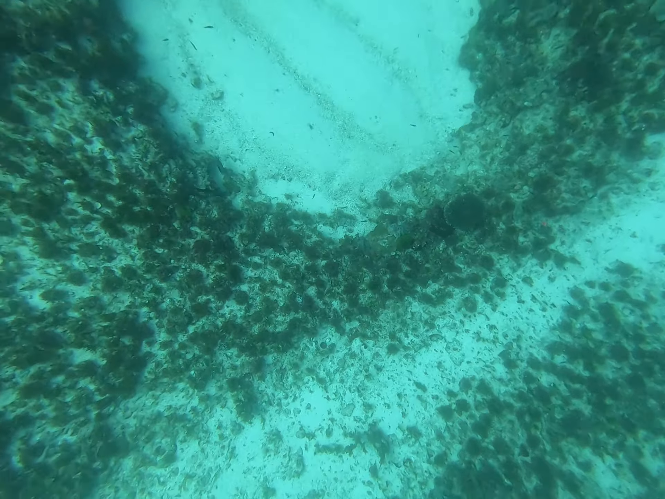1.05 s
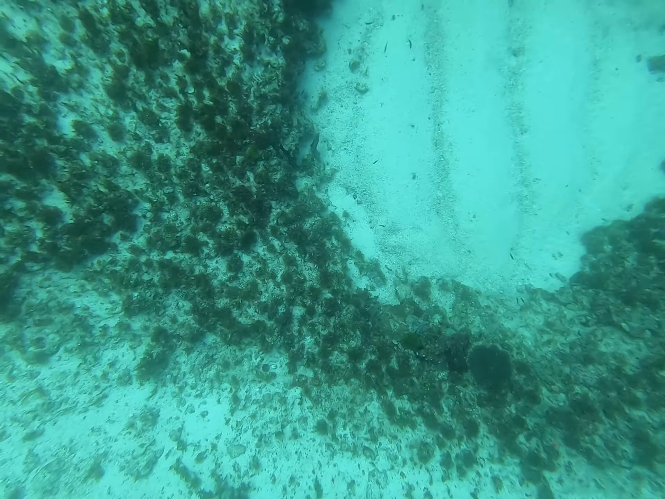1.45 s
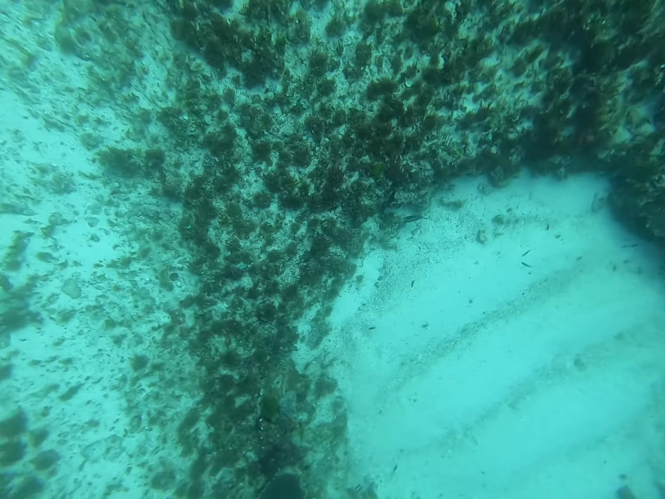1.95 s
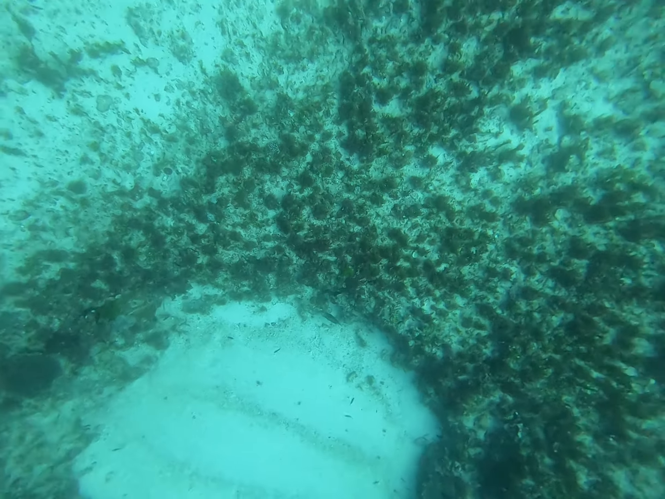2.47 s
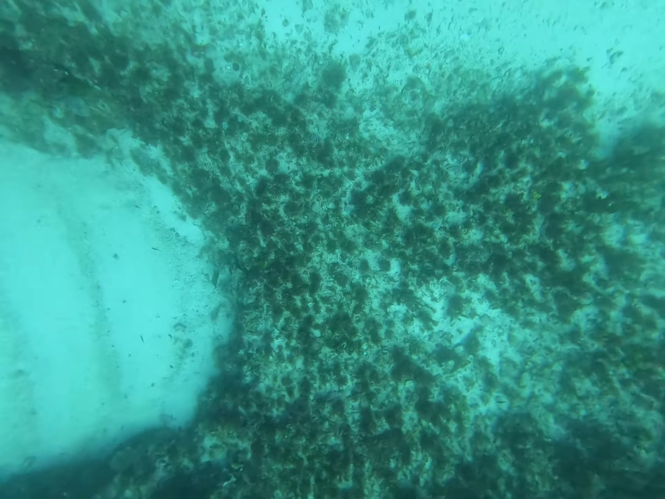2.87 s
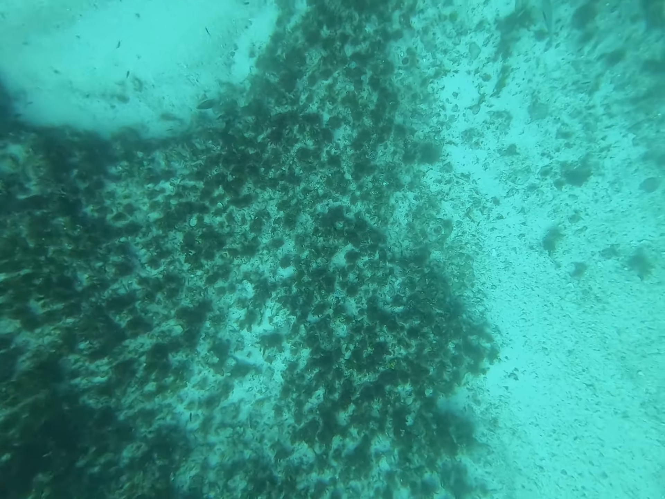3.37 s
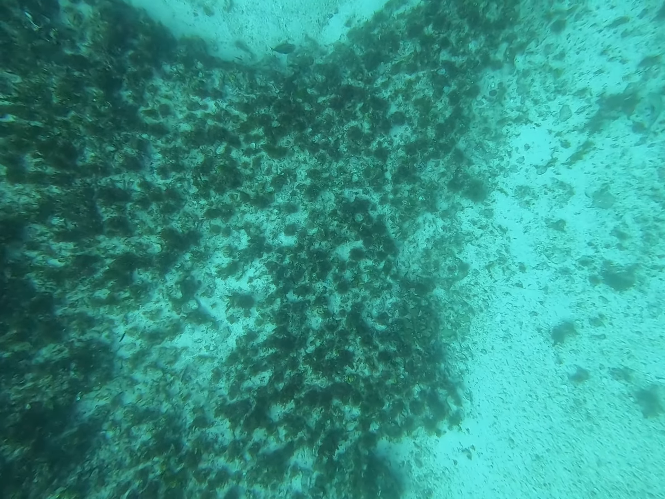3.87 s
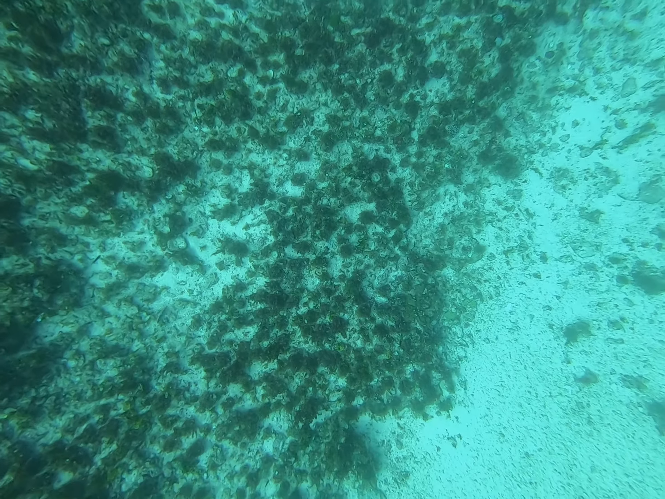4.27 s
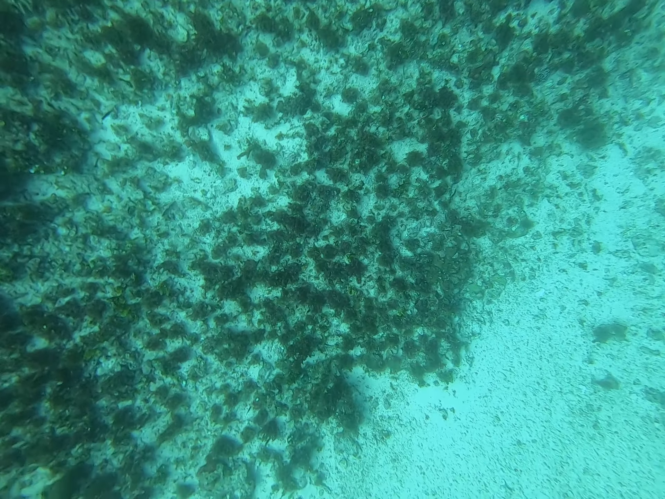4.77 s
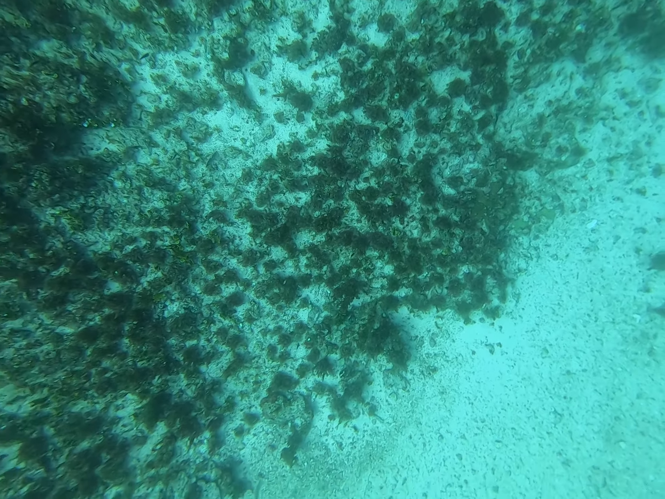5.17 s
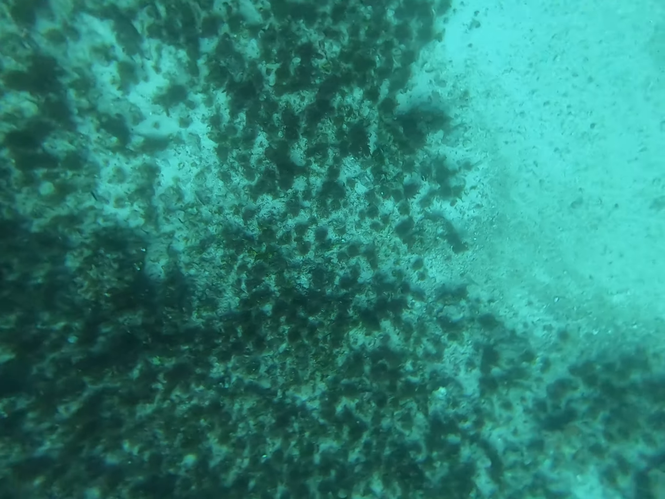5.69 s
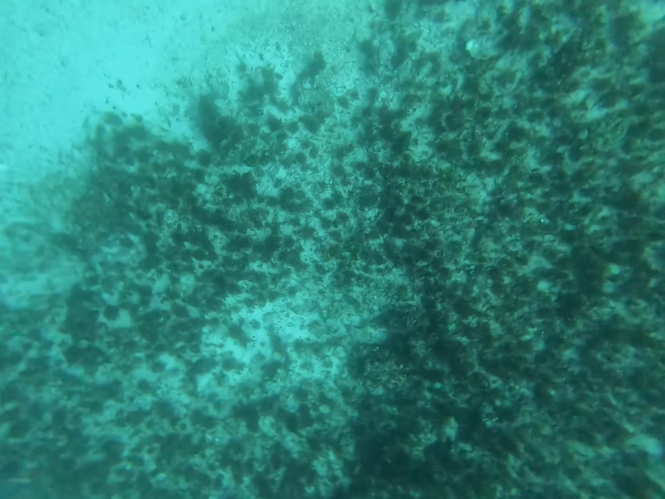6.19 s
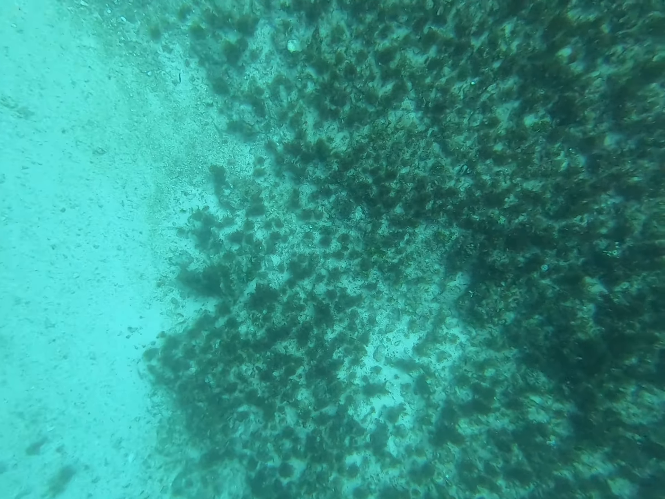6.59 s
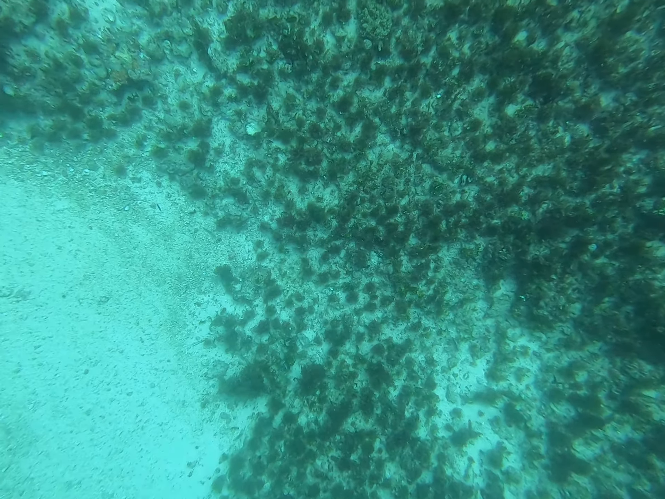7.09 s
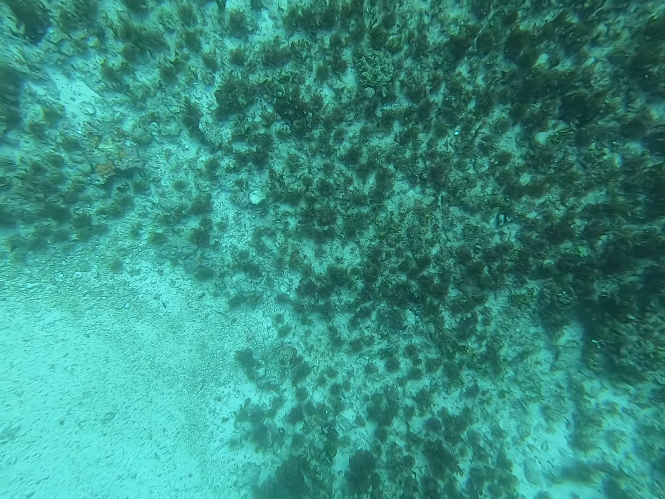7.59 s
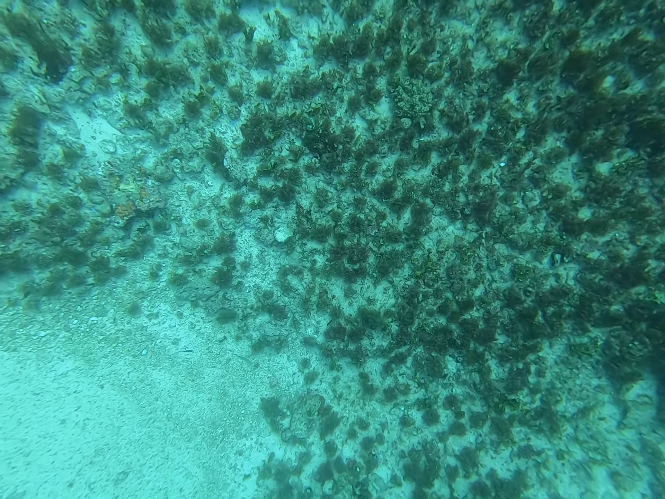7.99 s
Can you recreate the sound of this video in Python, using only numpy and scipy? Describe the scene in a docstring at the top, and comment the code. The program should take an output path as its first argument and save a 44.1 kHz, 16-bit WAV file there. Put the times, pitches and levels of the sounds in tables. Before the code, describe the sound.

Underwater close to a sandy, weedy sea floor, a boat engine hums with a hollow, wavering mid-low tone. Sparse shrimp snaps and fine crackle sit on top, with low water surges and soft knocks on the microphone housing. The hum dips slightly midway, then swells after six seconds, its wide stereo image narrowing to the centre as fluttering bright wash joins in.

```python
"""A boat engine drones through the water and rings the modes of a sealed housing near the sea floor.
From the start a wavering engine tone sounds, water surges thump and shrimp snap over a fine crackle.
The engine is noise sent through resonances; the snaps are noise puffs, the knocks short decaying swings.
From 5.5 s the colour changes, and from 6 s the wide image of two microphones narrows to the centre
as the rumble swells; from 7.4 s the colour drifts part of the way back."""
import sys
import numpy as np
from scipy import signal
from scipy.fft import rfft, irfft
from scipy.io import wavfile
from scipy.ndimage import uniform_filter1d

SR = 44100
rng = np.random.default_rng(int(sys.argv[2]) if len(sys.argv) > 2 else 0)


def wrap_up_sound(samples):
    """Save the sound to the file named by the first command line argument, as 16-bit audio."""
    columns = np.atleast_2d(samples).T
    # keep every value between -1 and 1, then stretch to whole-number steps
    tamed = np.clip(columns, -1, 1)
    steps = np.round(tamed * 32767).astype(np.int16)
    wavfile.write(sys.argv[1], SR, steps)


N = 363825
HZ = np.fft.rfftfreq(N, 1 / SR)


def from_db(db):
    """Turn decibels into a gain."""
    return 10 ** (np.asarray(db) / 20)


def rms_one(x):
    """Scale a signal to an rms (average strength) of 1."""
    return x / np.sqrt(np.mean(x ** 2) + 1e-30)


def in_time(rows):
    """Draw the columns of a curve table as straight lines between its times, at every sample."""
    s, *columns = np.transpose(rows)
    return [np.interp(np.arange(N) / SR, s, c) for c in columns]


def drift(rate):
    """Slow random wandering of spread 1, made by smoothing noise; a higher rate wanders faster."""
    step = 40  # samples between the computed points
    r = np.exp(-2 * step * np.pi * rate / SR)
    noise = rng.standard_normal(N // step + 2002)
    slow = signal.lfilter([1], [1, -2 * r, r * r], noise)[2000:]  # drop the start-up
    return np.interp(np.arange(N) / step, np.arange(len(slow)), rms_one(slow))


def ring(x, hz, width_hz):
    """One resonance: a click swings at its pitch and dies away, faster when the width is larger."""
    r, w = np.exp(-np.pi * width_hz / SR), 2 * np.pi * hz / SR
    return signal.lfilter([0, np.sin(w)], [1, -2 * r * np.cos(w), r * r], x + 1e-18)


def bursts(clicks, decay_s):
    """Each click becomes a puff of noise that dies within milliseconds, so that no two share a colour."""
    r = np.exp(-1 / (decay_s * SR))
    envelope = signal.lfilter([1 - r], [1, -2 * r, r * r], np.abs(clicks))
    return envelope * rng.standard_normal(N)


def magnitude(modes, column):
    """Gain over frequency of steep-sided modes whose powers add."""
    power = 0
    for mode in modes:
        offset = 2 * (HZ - mode[0]) / (1.277 * mode[1])
        power = power + from_db(2 * mode[column]) / (1 + offset ** 2) ** 2
    return np.sqrt(power)


def causal(gain):
    """Minimum-phase response of a gain curve, so that nothing rings ahead of its click."""
    cepstrum = irfft(np.log(gain), N)
    cepstrum[1:(N + 1) // 2] *= 2      # fold onto positive lags
    cepstrum[N // 2 + 1:] = 0
    return np.exp(rfft(cepstrum))


def notched(column):
    """Narrow dips where neighbouring modes cancel."""
    # dips: pitch_hz, width_hz, depth in the sum (0-1), depth once folded (0-1)
    notches = [(976, 54, 0.16, 0.05), (1052, 34, 0.05, 0.8), (1583, 37, 0.1, .45), (1686, 45, 0.4, .2),
               (8950, 830, 0.01, .97)]
    dips = [1 - np.clip(n[column], 0, 1) / (1 + 2j * (HZ - n[0]) / n[1]) for n in notches]
    return np.prod(dips, axis=0)


def crackle(share):
    """Distant shrimp: dense snaps of uneven size in loose bunches over smooth noise."""
    sizes = from_db(3.6 * np.minimum(rng.exponential(1, N), 4.0))
    chance = 400 * from_db(3.6 * drift(9.0)) / SR  # of a snap in each sample
    clicks = sizes * (rng.random(N) < chance)
    return rms_one(share * rms_one(bursts(clicks, 0.00027)) + rng.standard_normal(N))


def snaps(folded):
    """Near shrimp: a short puff into the upper housing modes, each with strengths of its own."""
    # shrimp snaps: start_s, level_db (before the modes), top_db (extra, of which each mode takes a share)
    snap_rows = [(0.0867, -46, -24), (0.1096, -44, -25), (0.3122, -42, -26), (0.5013, -41, -15),
                 (0.5836, -47, -17), (0.6195, -39, -29), (0.6888, -49, -22), (0.8669, -46, -23),
                 (1.1013, -37, -14), (1.1488, -47, -30), (1.2288, -34.5, -14), (1.3084, -43, -19),
                 (1.4194, -41, -22), (1.4581, -43, -18), (1.6317, -44, -32), (1.645, -39, -41),
                 (2.1171, -49, -28), (2.1916, -44.5, -11), (2.3136, -41, -23), (2.382, -48, -16),
                 (2.4085, -38.5, -24), (2.5366, -44, -22), (2.5611, -33, -30), (2.597, -34, -25),
                 (2.8654, -47, -24), (2.8958, -46, -24), (3.0614, -45, -19), (3.0764, -41, -25),
                 (3.0944, -46, -23), (3.386, -44.5, -16), (3.4111, -44, -12), (3.5164, -44, -18),
                 (3.5643, -43, -24), (3.5786, -38, -20), (3.6498, -45, -18), (3.7015, -47, -25),
                 (3.803, -39.5, -28), (4.0495, -38, -26), (4.0567, -36, -27), (4.0671, -30, -34),
                 (4.088, -38, -34), (4.15, -44, -22), (4.183, -37, -30), (4.195, -44, -20),
                 (4.252, -46, -20), (4.2758, -38, -25), (4.294, -34, -36), (4.595, -46, -20),
                 (4.8, -40, -25), (4.9043, -39, -27), (4.9682, -49, -14), (5.059, -36, -27),
                 (5.1677, -43, -25), (5.1999, -48, -21), (5.434, -41, -18), (5.4836, -41, -20),
                 (5.5786, -36, -37), (5.64, -42, -23), (5.6535, -39, -27), (5.7309, -40, -19),
                 (5.8004, -39, -30), (5.8521, -44, -31), (5.8731, -32, -31), (5.904, -36, -24),
                 (5.9466, -43, -29), (6.0243, -41, -25), (6.0447, -31, -29), (6.1664, -45, -22),
                 (6.188, -37.5, -25), (6.2337, -47, -22), (6.3818, -31.5, -17), (6.4453, -46, -23),
                 (6.4735, -35.5, -16), (6.515, -37, -25), (6.6523, -40, -18), (6.9192, -42, -29),
                 (7.0242, -41, -28), (7.0544, -47, -24), (7.0806, -43, -26), (7.3153, -40, -28),
                 (7.7112, -43, -23), (7.7503, -39, -21), (7.8166, -39, -25), (7.861, -26, -31),
                 (7.9295, -38, -9), (7.9513, -35, -23), (8.1501, -38, -24)]
    s, level_db, top_db = np.transpose(snap_rows)
    at, out = (s * SR).astype(int), np.zeros((2, N))
    luck_db = rng.normal(0, 1.0, (len(at), 5))
    # pitch_hz, width_hz, level_db, share of top_db, gain once folded_db
    modes = [(3410, 740, -4.5, 0.17, 4), (5670, 1300, -8.5, 0.0085, -6.0), (7300, 1200, -26.0, 0.23, 15),
             (8820, 1600, 0.0, 0.63, -4.5), (12000, 3000, -3.5, 0.79, -2)]
    for k, (hz, width_hz, mode_db, top_share, folded_db) in enumerate(modes):
        clicks = np.zeros(N)
        snap_db = level_db + mode_db + luck_db[:, k] + top_share * top_db + folded_db * folded[at]
        clicks[at] = from_db(snap_db)
        both = bursts(clicks, 0.0005)  # the part that both ears share
        for ear in range(2):
            puff = both + 1.33 * bursts(clicks, 0.00076)
            rung = ring(ring(puff, hz, width_hz), hz, width_hz)  # twice, for steep sides
            out[ear] += rung * (width_hz / SR) ** 1.41 * 30
    return out


def ticks():
    """One hard contact and a few milliseconds of rattle in a broad resonance, dull above 4 kHz."""
    # duller ticks on the housing: start_s, peak_db, pitch_hz
    tick_rows = [(.813, -30.5, 2920), (0.9591, -12, 1750), (3.5344, -29, 3000), (4.802, -34, 2906),
                 (5.061, -19, 2000), (5.0655, -31, 2700), (5.7181, -21.5, 3000), (5.875, -29, 3070),
                 (6.046, -29.5, 2800), (6.2345, -34, 3000), (6.381, -30.5, 3425), (7.0842, -40, 3222),
                 (7.7204, -33, 3000), (7.7506, -26, 2900)]
    # housing mode that a tick sets ringing: pitch_hz, width_hz, share
    tick_mode = (1790, 300, .25)
    tick_width_hz, rattle_decay_s, rattle_share = 1770, 0.0033, 0.07
    out, t = np.zeros(N), np.arange(600) / SR
    contact = t == 0
    ring_hz, ring_width_hz, ring_share = tick_mode
    dull = signal.butter(10, 4000, fs=SR, output="sos")
    for (s, peak_db, hz), noise in zip(tick_rows, rng.standard_normal((len(tick_rows), 600))):
        knock = contact + rattle_share * noise * np.exp(-t / rattle_decay_s)
        rung = ring(ring(knock, hz, tick_width_hz), hz, tick_width_hz)
        shape = signal.sosfilt(dull, rung)
        shape = shape / np.abs(shape).max() + ring_share * ring(contact, ring_hz, ring_width_hz)
        at = int(s * SR)
        out[at:at + 600] -= from_db(peak_db) * shape / np.abs(shape).max()
    return out


def pops():
    """One heavily damped low swing each, opposite in the two ears."""
    # low pops: start_s, level_db (before softening), side (+1 swings up in the left ear, -1 in the right)
    pop_rows = [(.686, -20, 1), (1.978, -12, 1), (2.352, -27, -1), (2.544, -19, 1), (2.727, -26, -1),
                (2.99, -24, -1), (3.229, -28, -1), (3.424, -27, -1), (3.568, -16, 1), (5.473, -22, -1),
                (5.807, -15, 1), (5.877, -10, -1), (5.958, -14, -1), (6.026, -21, 1), (6.17, -17, -1),
                (6.192, -21, 1), (6.247, -18, -1), (6.345, -27, 1)]
    pop_hz = 125
    out, t = np.zeros(N), np.arange(1500) / SR
    swing = np.exp(-t * pop_hz / 0.36) * np.cos(2 * np.pi * pop_hz * t)
    for s, level_db, ear in pop_rows:
        at = int(s * SR)
        out[at:at + 1500] += np.sign(ear) * from_db(level_db) * swing
    return signal.lfilter([.15], [1, -.85], out)  # soften the edges


def bumps():
    """A bump on the housing is a soft-edged low swing that glides in pitch as it dies."""
    # bumps: start_s, peak_db (of the envelope), start_hz, end_hz, decay_s
    bump_rows = [(0.269, -23, 200, 188, 0.021), (0.321, -33, 118, 162, 0.028),
                 (.42, -27.5, 178, 191, 0.025), (0.504, -27.5, 121, 148, 0.029),
                 (.588, -26, 149, 141, 0.016), (.66, -27.5, 145, 176, 0.021), (1.972, -11.5, 38, 48, 0.009),
                 (1.977, -28, 270, 151, 0.0086), (2.014, -19.5, 46, 44, 0.018),
                 (4.597, -24.5, 140.6, 140, 0.015), (4.636, -24.5, 110, 60, 0.024),
                 (7.272, -20, 212.3, 118.5, 0.014), (7.299, -11.5, 85, 45, 0.014)]
    out, t = np.zeros(N), np.arange(SR // 2) / SR
    for s, peak_db, start_hz, end_hz, decay_s in bump_rows:
        hz = end_hz + (start_hz - end_hz) * np.exp(-t / decay_s)
        envelope = np.e * t / decay_s * np.exp(-t / decay_s)
        at = int(s * SR)
        out[at:at + len(t)] += from_db(peak_db) * envelope * np.sin(2 * np.pi * np.cumsum(hz) / SR)
    return out


def surge():
    """Moving water rocks the housing near 45 Hz: noise in low resonances, evened, then given its levels."""
    # restless water: time_s, level_db
    sway = [(0, -35.5), (1.9, -32.5), (2.2, -38), (2.7, -45), (3.9, -43), (4.3, -35.5), (5.1, -48),
            (5.6, -31.5), (8.25, -39)]
    # pushes of water on the housing: middle_s, length_s, peak_db (added to the sway)
    pushes = [(0.048, 0.42, -26), (0.327, 0.078, -31), (0.73, 0.12, -33), (1.052, 0.11, -21.5),
              (1.22, 0.23, -21), (1.567, 0.2, -31), (1.682, 0.16, -29), (1.813, 0.071, -31),
              (1.94, 0.1, -26), (4.19, 0.079, -26), (4.356, 0.098, -36), (4.524, 0.17, -25),
              (4.69, .12, -30), (5.565, 0.11, -45), (5.732, 0.15, -37), (6.16, .1, -34), (7.299, 0.15, -23),
              (7.552, 0.27, -32), (7.904, 0.16, -29)]
    patchy_db = 2
    push = rng.standard_normal(N)
    rock = rms_one(ring(ring(push, 45.7, 9.7), 51.6, 19)) + 0.3 * rms_one(ring(push, 69, 35))
    even = np.sqrt(uniform_filter1d(rock ** 2, size=4500))  # strength over about 0.1 s
    t = np.arange(N) / SR
    level = from_db(in_time(sway)[0] + patchy_db * drift(9.7))
    for s, length_s, peak_db in pushes:
        level = level + from_db(peak_db) * np.cos(np.pi * np.clip((t - s) / length_s, -.5, .5)) ** 2
    return level * rock / even


def tone():
    """A wavering engine line: a sine roughened in pitch and level."""
    # engine tone: time_s, pitch_hz, level_db (rms, before the roughening)
    tone_rows = [(0.0, 549, -38.5), (0.5, 548, -31.5), (.72, 545.5, -36), (0.88, 541, -43.5),
                 (1.4, 545.6, -48), (1.72, 544, -41), (1.84, 538, -41.5), (2.2, 541, -45),
                 (2.75, 542.4, -37.5), (3.3, 543.6, -36), (4.4, 542.7, -40.5), (4.75, 542.3, -35.5),
                 (5.35, 544, -35.5), (6.0, 541, -42.5), (6.2, 543.6, -31.5), (7.0, 544.7, -39.5),
                 (7.6, 540.4, -30.5), (8.25, 541, -32)]
    hz, level_db = in_time(tone_rows)
    phase = 2 * np.pi * np.cumsum(hz + 2.2 * drift(6)) / SR
    rough_db = 2.2 * drift(6.7) + 2.95 * drift(48.0)
    return np.sqrt(2) * from_db(level_db + rough_db) * np.sin(phase)


def pickup(modes, drive, stray):
    """Send a drive through the modes to a sum, a difference and a folded signal; stray adds width alone."""
    # how the difference follows the sum: pitch_hz, phase lead_rad, likeness (0-1)
    pair_rows = [(50, 2.7, .9), (130, .8, .3), (360, .6, .2), (410, .2, .8), (540, -1, 1), (920, -2.5, 1),
                 (1020, -.8, .97), (1180, -.25, .95), (1370, -.9, .88), (1440, 0, .7), (1530, -.3, .85),
                 (1640, -3, .85), (1730, -3.5, 1), (1850, -4.3, .97), (1960, -5.6, .65), (2030, -7.8, .4),
                 (2090, -9.4, .88), (2190, -9.1, .88), (2330, -8, .95), (2500, -8.6, .92), (3000, -8, 1),
                 (5700, -8.5, 0.3), (12000, -8.5, .45)]
    pair_gain, apart_gain, folded_gain = [magnitude(modes, column=c) for c in range(2, 5)]
    folded = causal(folded_gain) * notched(column=3)
    hz, lead, alike = np.transpose(pair_rows)
    lead = np.interp(np.log(HZ + 1), np.log(hz), lead)
    alike = np.interp(np.log(HZ + 1), np.log(hz), np.clip(alike, 0, 1))
    drive = rfft(drive)
    pair = drive * causal(pair_gain)
    following = alike * pair / pair_gain * np.exp(1j * lead)
    side = apart_gain * (following + np.sqrt(1 - alike ** 2) * rfft(stray))
    scale = np.sqrt(np.mean(pair_gain ** 2))
    folded_scale = np.sqrt(np.mean(folded_gain ** 2))
    pair_sound = irfft(pair * notched(column=2), N) / scale
    return pair_sound, irfft(side, N) / scale, irfft(drive * folded, N) / folded_scale


def engine(folded, wide, wide_low):
    """Each voice of the boat and reef drives the housing modes in its range, following hum and wash."""
    # housing modes: pitch_hz, width_hz (nominal), then relative levels within a voice:
    # sum_db, difference_db, folded_db (folded to the centre)
    housing = [(84.2, 41, -58.5, -67.5, -43), (149, 41, -53, -75.5, -44), (208.2, 59, -57.5, -73, -48),
               (308, 97, -58.5, -83, -54), (405, 59, -52, -70, -43.5), (496, 135, -56, -80, -47),
               (586, 37, -56, -71.5, -45.5), (664.6, 81, -54, -57.5, -45), (795.7, 83, -50.5, -53, -45.5),
               (858, 84, -58, -48, -45), (890, 154, -96, -51, -73.5), (1085, 63, -66, -65, -54.5),
               (1227, 64, -69.5, -76.5, -60.5), (1370, 108, -64, -80, -54.5), (1493, 74, -67.5, -74, -57),
               (1640, 50, -82.5, -75, -93), (1808, 103, -60.5, -73.5, -51), (1972, 240, -70.5, -85, -57),
               (2336, 173, -77, -78, -70), (2640, 240, -81.5, -84.5, -77), (2956, 200, -86, -89, -78),
               (3383, 340, -88, -90.5, -77.5), (4040, 570, -100, -99, -85.5), (4710, 380, -101, -92.5, -87),
               (5600, 1020, -95.5, -99, -105), (6230, 540, -100, -98, -107), (7080, 1100, -106, -100, -91),
               (8460, 1300, -102, -105, -94.5), (9450, 1600, -106, -106, -100),
               (11600, 1400, -109, -110, -107), (14000, 2000, -120, -120, -117)]
    # engine and shaft orders, narrow and unsteady: the same columns
    orders = [(154.3, 9.6, -58, -73.5, -36.5), (197.6, 16, -70, -84, -45.5), (283.4, 18, -54.5, -79, -46.5),
              (333, 16, -57, -79, -54), (397, 11, -53.5, -71, -41.5), (407.5, 7.5, -60.5, -69, -47),
              (445.8, 18.7, -65.5, -74.5, -37.5), (655.5, 17, -51, -56, -58), (766.3, 18, -53, -56.5, -54),
              (809, 13, -56, -53.5, -52), (854, 14, -57.5, -54.5, -59), (1143, 54, -73, -76, -51.5),
              (1317, 26, -67, -77.5, -57), (1383, 29, -65.5, -80.5, -57.5), (1617, 20, -68, -75.5, -82),
              (1732, 24, -62, -78.5, -64.5), (1800, 26, -59.5, -70.5, -59), (1836, 19, -63.5, -76, -57.5)]
    # range of modes that each voice drives: low_hz, high_hz
    voice_edges = [(125, 230), (230, 330), (330, 500), (500, 1020), (1020, 2500), (2500, 5000),
                   (5000, 20000), (0, 125)]
    # voices: flicker_db, crackle share, narrowest width_db, level_db (at the quiet levels below),
    # share of the hum's swing, share of the wash's swing, gain once folded_db
    voices = [(0.15, 0.0, -82, -35, 0.87, 0.01, 0.7), (0.3, 0.0, -80, -37, 0.93, 0.01, 0.5),
              (0.7, 0.0019, -83, -34, 0.96, 0.01, -0.47), (0.9, 0.0024, -80, -34, 0.88, 0.066, -1),
              (1.0, 0.1, -80, -38, 0.77, 0.57, -2), (1.84, 0.65, -27.5, -59, 0.039, .95, -0.1),
              (1, 0.88, -18.5, -67, 0.27, 0.72, -3), (2.5, 0.053, -83, -41.5, 0.31, 0.27, 5)]
    # hum of the voices without a drone or whine curve: time_s, level_db
    hum = [(0, -22.5), (.5, -26), (.9, -28.5), (1.9, -30.5), (2.15, -32.5), (2.6, -28.5), (3.3, -26),
           (4.15, -26), (4.7, -28), (5.5, -31), (5.9, -25.5), (6.2, -19.5), (6.8, -21.5), (7.0, -19),
           (7.3, -19.5), (7.63, -21.5), (8.0, -21), (8.25, -21.5)]
    # wash, mainly in the treble, which comes in swells as the boat nears: time_s, level_db
    wash = [(0, -59.5), (.8, -58), (1.4, -60.5), (2.0, -59.5), (4.0, -58), (5.4, -57), (5.72, -52.5),
            (5.9, -52.5), (6.2, -56), (6.7, -51.5), (6.76, -50.5), (6.78, -45), (6.85, -43.5),
            (6.87, -48.5), (6.9, -39), (6.94, -50), (6.98, -49), (7.0, -56), (7.03, -48), (7.07, -51),
            (7.09, -41), (7.17, -43), (7.19, -48), (7.22, -45), (7.28, -45.5), (7.3, -52), (7.32, -46),
            (7.36, -48), (7.39, -43.5), (7.5, -46), (7.53, -51), (7.57, -46), (7.65, -52.5), (7.71, -44.5),
            (7.88, -50.5), (8.0, -47), (8.25, -50)]
    # low drone: time_s, level near 160 Hz_db, level near 280 Hz_db, level near 400 Hz_db
    drone = [(0.0, -39, -34, -32.5), (0.37, -31, -40, -34.5), (0.8, -34, -46.5, -36.5),
             (2.18, -42, -42, -41), (2.71, -36, -46, -36.5), (4.18, -34.5, -39.5, -34.5),
             (4.78, -39, -37.5, -41.5), (5.01, -44, -40.5, -36.5), (5.77, -32.5, -39.5, -35.5),
             (5.88, -29.5, -40, -31.5), (6.07, -34, -41.5, -29), (6.25, -26.5, -32, -23.5),
             (6.27, -29.5, -40, -23.5), (6.64, -25.5, -48, -25), (6.69, -22.5, -34, -23.5),
             (7.01, -25.5, -34.5, -23), (7.42, -25.5, -31, -26.5), (8.09, -35.5, -31, -34.5),
             (8.18, -27, -36, -31), (8.25, -34, -30, -37)]
    # whine between 1 and 2.5 kHz, apart from the wash: time_s, level_db
    whine = [(0, 1), (.8, 1.5), (2, -2), (2.8, -1), (3.6, 3), (4.2, 1.2), (4.8, -1), (5.5, 0.5), (6, 3.5),
             (6.4, 2), (7, 5), (8.25, 2)]
    # the hum dips briefly, in each voice by its hum share: middle_s, length_s, change_db
    hum_dip = (7.018, 0.029, -6)
    # the voices sound at their own level when hum, wash and drone stand here
    quiet_hum_db, quiet_wash_db, quiet_drone_db = -29, -59, -36
    throb_db, throb_rate = 1.0, 33  # the wash throbs in all its bands at once
    treble_fold_lag = 2.0           # power by which the treble trails the change of colour

    mid = side = 0
    hum_db = in_time(hum)[0] - quiet_hum_db
    wash_db = in_time(wash)[0] - quiet_wash_db + throb_db * drift(throb_rate)
    own_curves_db = dict(zip((125, 230, 330), np.array(in_time(drone)) - quiet_drone_db))
    own_curves_db[1020] = in_time(whine)[0]  # keyed by the low edge of the voice
    dip_s, dip_length_s, dip_db = hum_dip
    dip_db = dip_db * np.exp(-(2 * (np.arange(N) / SR - dip_s) / dip_length_s) ** 4)
    for (low, high), voice in zip(voice_edges, voices):
        flicker_db, share, narrowest_db, own_db, hums, washes, folded_db = voice
        modes = [m for m in housing + orders if low <= m[0] < high]
        if share:
            heard = share * (1 - 0.16 * folded)  # less crackle once folded
            drive, stray = crackle(heard), crackle(heard)
        else:
            drive, stray = rng.standard_normal((2, N))
        pair, apart, centre = pickup(modes, drive, stray)
        swing_db = hums * (own_curves_db.get(low, hum_db) + dip_db) + washes * wash_db
        flicker = flicker_db * (drift(31.0) + 0.3 * drift(6.0))
        gain = from_db(own_db + swing_db + flicker)
        turned = folded ** treble_fold_lag if low >= 5000 else folded
        mid = mid + gain * ((1 - turned) * pair + turned * from_db(folded_db) * centre)
        width = np.maximum(wide_low if high <= 500 else wide, from_db(narrowest_db))
        side = side + gain * apart * width
    return mid, side


def scene():
    """Add the sources up as sum and difference of the two microphones, then spread them left and right."""
    # width of the bass before it narrows: time_s, gain of the difference_db
    width_low = [(0, 0.5), (2.2, 8.5), (3.7, -7.5), (5.3, -3), (5.9, 6), (8.25, 6.5)]
    fold_start_s, fold_length_s = 5.47, 0.95   # the colour changes over to the folded one
    return_start_s, return_per_s = 7.4, 0.27   # and drifts part of the way back
    # the width dies away, faster below 500 Hz
    narrow_start_s, narrow_db_per_s, narrow_low_db_per_s = 6.025, 49, 108
    width_db = 0.9

    t = np.arange(N) / SR
    turning = np.minimum((t - fold_start_s) / fold_length_s, 1)
    returning = return_per_s * np.maximum(t - return_start_s, 0)
    folded = np.clip(turning - returning, 0, 1)
    narrowing_s = np.maximum(t - narrow_start_s, 0)
    wide = from_db(-narrow_db_per_s * narrowing_s)
    wide_low = from_db(in_time(width_low)[0] - narrow_low_db_per_s * narrowing_s)

    near, tick = snaps(folded), ticks()
    rock = surge() + bumps()
    line = tone()
    mid, side = engine(folded, from_db(width_db) * wide, wide_low)
    late_line = np.roll(line, 14)      # the difference lags the sum at this pitch
    mid = mid + line + rock + near.mean(axis=0) + tick
    apart = from_db(-8.0) * late_line - from_db(-13.5) * wide * rock  # the rocking narrows twice as fast
    apart = apart + (near[0] - near[1]) / 2 - 0.39 * tick
    side = side + pops() + wide * apart
    return np.array([mid + side, mid - side])


def record(dry):
    """Each channel adds a faint bright hiss of its own; the lowest bass and the top are cut."""
    hiss_gain_db, cutoff_hz = -72.5, 15800
    bright = signal.butter(2, [10500, 14000], "band", fs=SR, output="sos")
    hiss = signal.sosfilt(bright, rng.standard_normal((2, N)))
    bass_cut = signal.butter(2, 24, "high", fs=SR, output="sos")
    dry = signal.sosfilt(bass_cut, dry + from_db(hiss_gain_db) * hiss)
    return signal.sosfilt(signal.ellip(12, .5, 60, cutoff_hz, fs=SR, output="sos"), dry)


dry = scene()
out = record(dry)
wrap_up_sound(out)
```